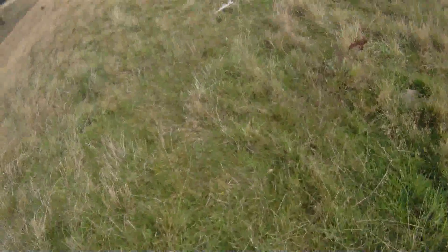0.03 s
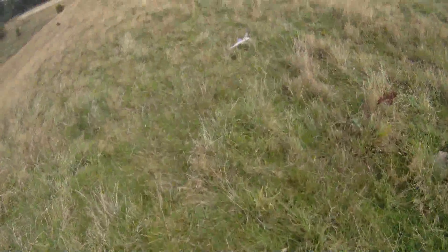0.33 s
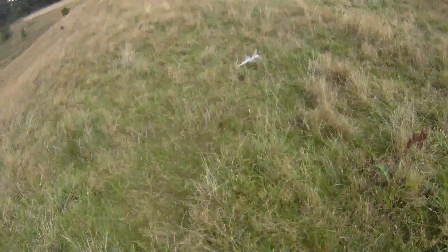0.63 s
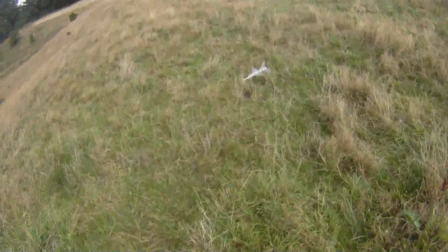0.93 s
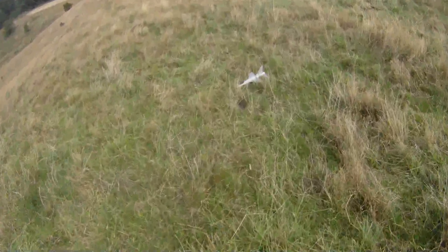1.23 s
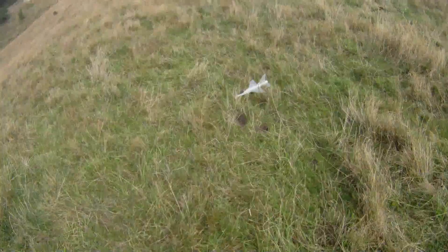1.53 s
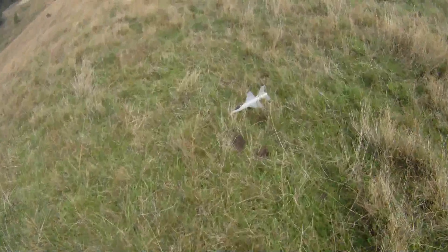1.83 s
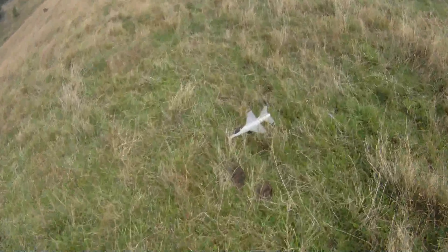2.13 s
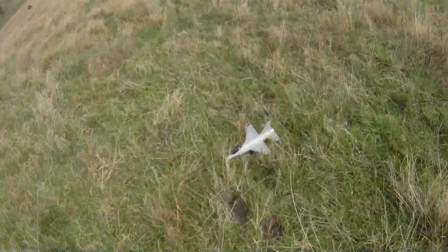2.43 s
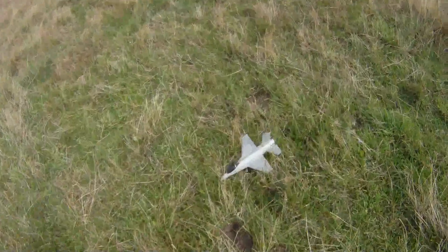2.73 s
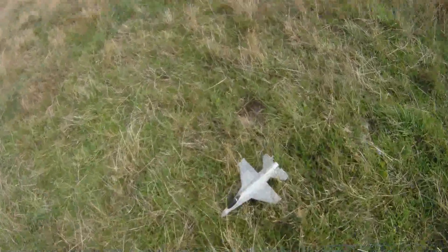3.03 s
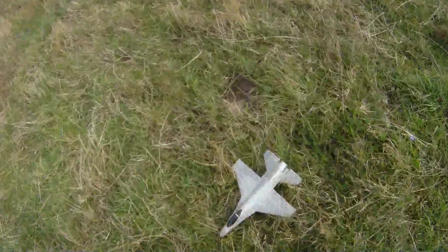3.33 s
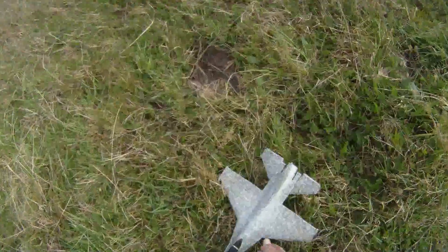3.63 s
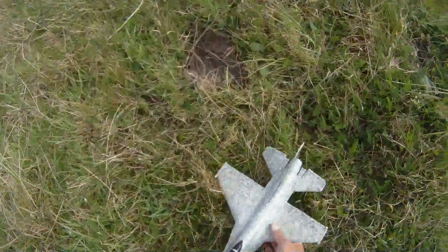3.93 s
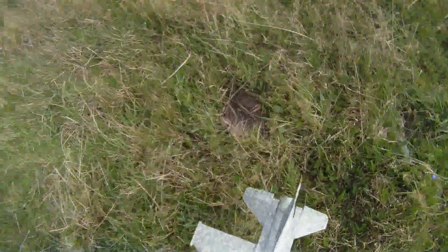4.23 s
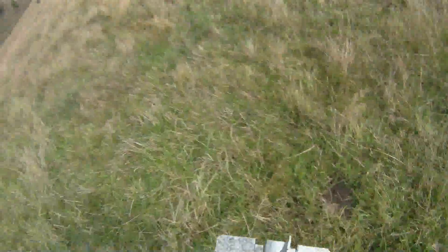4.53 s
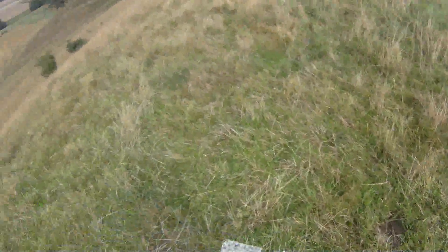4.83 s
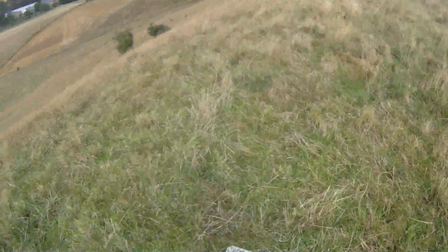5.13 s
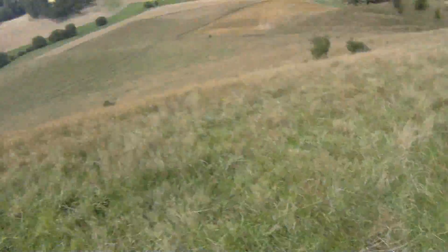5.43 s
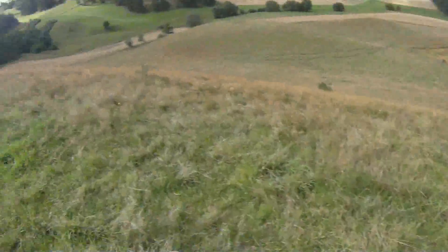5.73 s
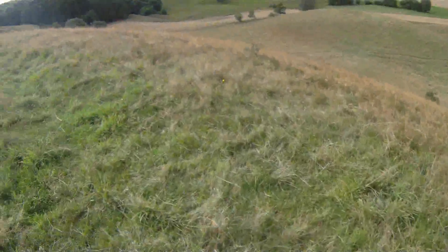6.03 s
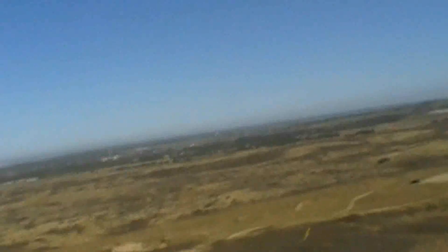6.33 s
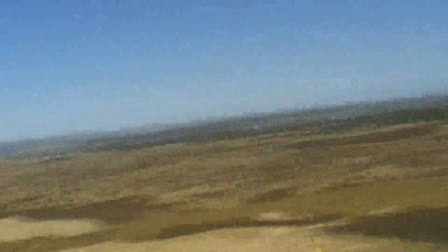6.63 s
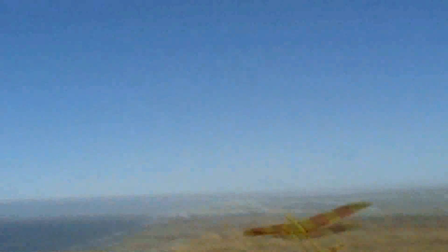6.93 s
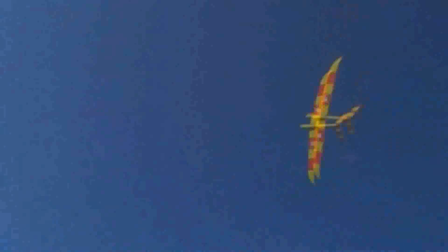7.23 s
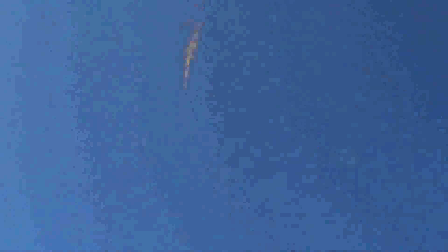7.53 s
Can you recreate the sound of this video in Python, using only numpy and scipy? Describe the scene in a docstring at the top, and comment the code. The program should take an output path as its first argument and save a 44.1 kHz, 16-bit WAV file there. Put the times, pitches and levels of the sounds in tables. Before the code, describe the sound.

Wind buffets the microphone on an open hillside, then cuts off before a model glider rushes by with a shrill whistle and falling whoosh.

```python
"""Wind buffets a hand-held microphone on a grassy hillside: gusts build, break with a push and leave lulls.
Near 4 s a foam model plane is picked up with a faint rustle. At 6.3 s the wind ends on a thump.
After a short silence a model glider rushes past very close, its edge-tone whistle overloading the
microphone at 7.1 s. Its hollow whoosh sinks away and its wake fades into a steady roar of air."""
import sys
import numpy as np
from scipy import signal
from scipy.fft import rfft, irfft
from scipy.io import wavfile
from scipy.ndimage import uniform_filter1d, map_coordinates

SR = 44100
rng = np.random.default_rng(int(sys.argv[2]) if len(sys.argv) > 2 else 0)


def wav_out(sig):
    """Save sig, one row per channel (or a flat mono array), as 16-bit PCM at SR to the path in sys.argv[1]."""
    wavfile.write(sys.argv[1], SR, np.round(np.clip(np.atleast_2d(sig).T, -1, 1) * 32767).astype(np.int16))


N = 335160
TIME, FREQS = np.arange(N) / SR, np.fft.rfftfreq(N, 1 / SR)


def glider():
    """The pass overloads the microphone: the whistle flattens and gains a third harmonic."""
    left, right = rush() + whoosh() + moans() + whistle()
    lag_s = 4e-6 + 8e-6 * bell(7.07, 0.19)  # the sound reaches the right port first
    left = amp(-1.36) * map_coordinates(left, [(TIME - lag_s) * SR], order=3, mode="nearest")
    ceiling = amp(-17)
    return ceiling * np.tanh(np.array([left, right]) * amp(0.5) / ceiling)


# Edge tone. Each row: time in seconds, pitch in Hz, ragged share of the power from 0 to 1.
EDGE_TONE = [(6.85, 5115, 0.5), (6.882, 5136, 0.13), (6.905, 5062, 0.75), (6.96, 4890, 0.98),
             (7.005, 4814, 0.52), (7.045, 4890, 0.91), (7.083, 5010, 0.05), (7.103, 4790, 0.4),
             (7.13, 4790, .65), (7.148, 4484, 0.1), (7.175, 4360, .9)]
# Brief catches in the tone. Each row: centre in seconds, depth in dB, width in seconds.
TONE_CATCHES = [(6.914, 10, 0.0036), (7.126, 9, 0.0048)]

def whistle():
    """An edge tone beats against ragged side tones and swells as the glider nears; a thin shriek joins."""
    start_s, release_s, attack_s = 6.851, 7.088, 0.017
    start_db, swell_db_per_s, release_db_per_s = -16, 34, 350
    hz, ragged = curves(EDGE_TONE)
    held_s = np.clip(TIME, start_s, release_s) - start_s
    level_db = start_db + swell_db_per_s * held_s - release_db_per_s * np.maximum(TIME - release_s, 0)
    level_db -= sum(depth_db * bell(s, width_s) for s, depth_db, width_s in TONE_CATCHES)
    envelope = np.minimum(held_s / attack_s, 1) * amp(level_db)
    clean = np.sqrt(2) * np.sin(2 * np.pi * np.cumsum(hz + 18 * wander(rate_hz=140)) / SR)
    drift_hz = 0.27 * (hz - hz[0])
    lower = amp(-4.5) * resonance(5105 + drift_hz, width_hz=136, spread=0.11)
    upper = amp(-8) * resonance(5335 + drift_hz, width_hz=200, spread=0.12)
    skirt = amp(-15.5) * resonance(5290 + drift_hz, width_hz=560, spread=0.28)
    shriek = amp(-32) * bell(7.003, 0.062) * resonance(hz * 1.79, width_hz=1100, spread=0.35)
    tone = clean * np.sqrt(1 - ragged) + (lower + upper + skirt) * np.sqrt(ragged)
    return tone * envelope + shriek * amp(3.4 * wander(rate_hz=97))


# Spectra of wing swish, wake roar and port eddies. Each row: frequency in Hz, level in dB.
SWISH_SPECTRUM = [(800, -13), (2000, -5.5), (3000, -1), (4100, -3), (5200, 2.5), (6300, -4), (7500, -3.5),
                  (9500, -9), (10300, -13), (11500, -15.5), (13300, -29), (14200, -50)]
ROAR_SPECTRUM = [(30, -32), (90, -12), (180, -5), (350, -0.5), (750, 1.5), (1300, -2.5), (1800, -9),
                 (2400, -10), (5000, -46)]
EDDY_SPECTRUM = [(20, -16), (60, -10), (130, 1), (350, -0.5), (600, -4), (1200, -39)]
# Stereo image of swish and roar. Each row: frequency in Hz, left-right correlation.
RUSH_CORRELATION = [(30, -0.56), (150, 0.76), (400, 0.88), (1000, 0.83), (2400, 0.9), (6000, 0.88),
                    (9000, 0.73), (15000, 0.47)]
# Eddies at the microphone ports. Each row: centre in seconds, level in dB, width in seconds.
EDDY_BURSTS = [(6.852, -50, 0.24), (7.178, -36, 0.0043), (7.48, -48, .04)]

def rush():
    """Air over the wings swishes louder with nearness; the wake roars behind and eddies shake the ports."""
    pass_s, near_s, pass_db, fall_db_per_decade = 7.097, 0.12, -28.5, 33
    wake_s, rise_s, decay_s, wake_db, air_db = 7.16, 0.1, 0.16, -32, -42
    distance = np.hypot(1, (TIME - pass_s) / near_s)  # 1 at the closest point
    swish_gain = amp(pass_db - fall_db_per_decade * np.log10(distance))
    wake = np.exp(-np.maximum((wake_s - TIME) / rise_s, (TIME - wake_s) / decay_s))
    roar_gain = np.hypot(amp(air_db), amp(wake_db) * wake)
    correlation, churn = at_freqs(RUSH_CORRELATION), wander(rate_hz=61)
    eddy_gain = sum(amp(db) * bell(s, width_s) for s, db, width_s in EDDY_BURSTS)
    eddies = noise(EDDY_SPECTRUM, correlation=0.22) * eddy_gain
    roar = noise(ROAR_SPECTRUM, correlation) * roar_gain * amp(1.25 * churn)
    swish = noise(SWISH_SPECTRUM, correlation) * swish_gain * amp(0.99 * churn)
    return roar + swish + eddies


# Wing resonance. Each row: time in seconds, pitch in Hz, level in dB.
WHOOSH_GLIDE = [(7.084, 1599, -54), (7.11, 1460, -35.5), (7.135, 1260, -31.5), (7.16, 902, -29.5),
                (7.18, 542, -34), (7.2, 498, -65), (7.3, 450, -71)]

def whoosh():
    """A hollow resonance falls in pitch as the wing goes by; a higher one joins it briefly."""
    hz, level_db = curves(WHOOSH_GLIDE)
    hollow = resonance(hz, width_hz=420, spread=0.085)
    upper = resonance(hz * 2.3, width_hz=280, spread=0.2) * amp(1) * bell(7.12, 0.022)
    return (hollow + upper) * amp(level_db) * gate(WHOOSH_GLIDE[0][0], WHOOSH_GLIDE[-1][0])


# Faint moans in the rush. Each row: centre in seconds, pitch in Hz, level in dB, width in seconds.
MOAN_SWELLS = [(6.70, 2900, -46.5, 0.023), (6.842, 2800, -47, 0.015), (7.32, 3600, -44, 0.039),
               (7.431, 1960, -45.5, 0.018), (7.577, 1820, -43.5, .035)]

def moans():
    """Each moan swells and fades in one narrow resonance."""
    centre_s, hz, level_db, width_s = np.transpose(MOAN_SWELLS)
    nearest = abs(TIME[:, None] - centre_s).argmin(1)
    swell = amp(level_db[nearest]) * bell(centre_s[nearest], width_s[nearest])
    return swell * resonance(hz[nearest], width_hz=150, spread=0.13)


# Spectra of the three wind layers. Each row: frequency in Hz, level in dB.
RUMBLE_SPECTRUM = [(10, -13.5), (25, -2), (45, 2.5), (90, 1.5), (150, -4.5), (230, -15), (400, -28.5),
                   (900, -81)]
FLUTTER_SPECTRUM = [(60, -35.5), (140, 3), (220, 1.5), (330, -1.5), (460, -3.5), (570, -9.5), (720, -20),
                    (1000, -30), (1600, -42), (4000, -78.5)]
HISS_SPECTRUM = [(400, -11.5), (900, 9.5), (1400, 2.5), (2200, 0.5), (3600, -5.5), (4200, -15.5),
                 (5000, -17.5), (6100, -39), (7500, -19), (9500, -14.5), (11000, -20.5), (15000, -29)]
# Slow wind strength before gusts. Each row: time in seconds, flutter in dB, hiss in dB.
WIND_LEVELS = [(0.0, -38, -77), (0.1, -38, -65), (0.38, -36.5, -65.5), (0.78, -38.5, -71.5),
               (1.3, -41.5, -71.5), (1.53, -36.5, -66), (1.7, -40, -73), (2.25, -38.5, -70),
               (2.6, -45, -74), (3.1, -41.5, -71), (3.42, -52.5, -86), (3.7, -55.5, -73.5),
               (3.95, -49.5, -75), (4.25, -40, -71.5), (4.55, -38.5, -65.5), (4.88, -36.5, -65.5),
               (5.35, -49, -74), (5.9, -43, -68), (6.25, -38.5, -67)]

def wind():
    """Turbulence at the microphone: the same gusts and eddies shake rumble, flutter and, most, hiss."""
    calm_db, even_db = -53.5, -45.5  # flutter below these: the rumble dies, the wind grows patchier
    flutter_db, hiss_db = curves(WIND_LEVELS)
    gust_db = gusts_db()
    flutter_db += gust_db
    hiss_db += 1.1 * gust_db
    rumble_db = -38 + 0.48 * gust_db - 0.84 * np.maximum(calm_db - flutter_db, 0)
    patchiness = np.clip(0.5 + 0.042 * (even_db - flutter_db), 0.5, 1.4)
    eddies = patchiness * unit(0.45 * wander(rate_hz=26) + wander(rate_hz=55) + 0.89 * wander(rate_hz=243))
    rumble = steadied(noise(RUMBLE_SPECTRUM) * amp(1.3 * eddies))
    flutter = steadied(noise(FLUTTER_SPECTRUM) * amp(2.8 * eddies))
    tearing_db = 2.3 * abs(rumble[0])  # air tears off hardest on the pressure peaks
    hiss = steadied(noise(HISS_SPECTRUM) * amp(3.8 * eddies + tearing_db))
    return rumble * amp(rumble_db) + flutter * amp(flutter_db) + hiss * amp(hiss_db)


# Gusts breaking on the microphone. Each row: time in seconds, push in dB, crackle in dB,
# build-up in dB (none if negative), lull depth in dB, lull length in seconds.
GUSTS = [(0.21,-34,-57.5,-4,7,0.037), (0.69,-37,-64,4.5,1,0.064), (0.985,-29.5,-61,2.5,5,0.025),
         (1.033,-31,-58,4,2,0.048), (1.162,-39,-59,7,7,0.049), (1.502,-39,-65,3.5,1.5,0.14),
         (1.612,-34,-67.5,1,6,0.041), (1.902,-35,-61,2.5,10,0.089), (2.058,-30,-69,1.5,1,0.14),
         (2.41,-32,-66,-3.5,8,0.026), (2.865,-30,-59,2,7,0.13), (3.123,-41,-60,1,0.5,0.07),
         (3.207,-28,-62.5,1,4,0.079), (3.3,-27,-62,1.5,8.5,0.2), (3.337,-29,-62.5,6.5,3.5,0.051),
         (3.478,-28.5,-63,1,0.5,0.068), (3.606,-28,-61,13,10,0.15), (3.792,-33.5,-64,15.5,4,0.19),
         (3.99,-28,-52.5,9.5,11,0.042), (4.136,-28,-62,1,9,0.03), (4.217,-30,-57,-2,8.5,0.1),
         (4.326,-29.5,-61,0,1,0.18), (4.704,-29,-65,3,4.5,0.11), (4.889,-35,-62,3,3.5,0.046),
         (4.969,-27.5,-57,3,3.5,0.12), (5.144,-32.5,-63,2.5,2,0.14), (5.293,-33,-64,4,1,0.11),
         (5.445,-33,-65,6.5,2,0.06), (5.848,-26.5,-62,6.5,2.5,0.027), (5.921,-33,-68,8,5,0.14),
         (6.202,-44,-62.5,6,6.5,0.059), (6.28,-35,-63,9,0,0.05)]

def gusts_db():
    """Each gust builds up, collapses just after it breaks, and leaves a lull."""
    build_s, collapse_s, lag_s = 0.028, 0.0069, 0.0064
    t = np.arange(0, N / SR, 0.001)
    level_db = np.zeros(len(t))
    for break_s, _, _, build_db, lull_db, lull_s in GUSTS:
        age_s = t - break_s
        broken = 0.5 + 0.5 * np.tanh((age_s - lag_s) / collapse_s)
        level_db += (1 - broken) * max(build_db, 0) * np.exp(-(age_s / build_s) ** 2)
        level_db -= broken * lull_db * np.exp(-(age_s / lull_s) ** 4)
    return np.interp(TIME, t, level_db)


# Knocks of air that end the wind. Each row: time in seconds, push in dB, width in seconds, crackle in dB.
AIR_THUMPS = [(6.2692, -20, 0.0009, -44.5), (6.2805, -15.5, 0.0022, -49), (6.2865, -26, 0.0012, -48)]

def pushes():
    """A breaking gust or a thump pushes and then pulls on the diaphragm, with a crackle."""
    typical_width_s, crackle_decay_s = 0.0029, 0.002
    breaks = [(s, push_db, typical_width_s * np.exp(0.29 * rng.standard_normal()), crackle_db)
              for s, push_db, crackle_db, *_ in GUSTS]
    pressure, crackle_gain = np.zeros((2, N))
    for s, push_db, width_s, crackle_db in breaks + list(AIR_THUMPS):
        near = slice(max(int((s - 0.04) * SR), 0), int((s + 0.04) * SR))
        age_s = TIME[near] - s
        u = age_s / width_s
        pressure[near] -= amp(push_db) * u * np.exp((1 - u ** 2) / 2)
        crackle_gain[near] += amp(crackle_db) * np.exp(-abs(age_s) / crackle_decay_s)
    return pressure + crackle_gain * crackle()


# Crackle spectrum. Each row: frequency in Hz, level in dB.
CRACKLE_SPECTRUM = [(400, -10), (1100, 5.5), (2500, -2), (4500, -9), (6100, -22.5), (7500, -12.5),
                    (10000, -16.5), (15500, -30.5)]

def crackle():
    """The bright noise of air breaking on the microphone."""
    return noise(CRACKLE_SPECTRUM, correlation=0.8)


# Hand gripping the plane. Each row: time in seconds, level in dB, squeak pitch in Hz.
GRIP = [(3.78, -110, 3100), (3.84, -78, 3000), (3.89, -72, 2920), (3.92, -71, 2500), (3.948, -68, 2270),
        (3.957, -62, 2120), (3.966, -76, 2100), (4.0, -110, 2100)]
# Foam friction spectrum. Each row: frequency in Hz, level in dB.
FOAM_SPECTRUM = [(1200, -24), (2000, -7.5), (2400, 2.5), (3000, -1), (3700, -1), (4300, -14), (6100, -33.5)]

def rustle():
    """Foam rubs in small, uneven slips; a falling squeak takes over as the grip tightens."""
    level_db, hz = curves(GRIP)
    squeak = resonance(hz, width_hz=220, spread=0.12) * amp(-7 + 7.6 * bell(3.955, 0.034))
    friction = noise(FOAM_SPECTRUM, correlation=0.9) * amp(-2.5)
    slips_db = 2.2 * wander(rate_hz=140)
    return (friction + squeak) * amp(level_db + slips_db)


# Grass spectrum. Each row: frequency in Hz, level in dB.
GRASS_SPECTRUM = [(200, -3.5), (900, 0), (3500, -7.5), (6100, -21), (8000, -13), (15000, -22)]

def grass():
    """A faint, wide hiss of wind in the grass."""
    return amp(-80) * noise(GRASS_SPECTRUM, correlation=0.091)


def converter_fizz(x, mirrors_hz=(12000, 8000)):
    """A coarse converter mirrors the slope of the sound around two high frequencies."""
    upper, lower = np.cos(2 * np.pi * np.outer(mirrors_hz, TIME))
    return np.gradient(x, axis=1) * (amp(0.5) * upper + amp(-20.5) * lower)


def noise(spectrum, correlation=1.0):
    """Stereo noise of rms 1 with a given spectrum and left-right correlation."""
    mid, side = rfft(rng.standard_normal((2, N)))
    mid, side = mid * np.sqrt(1 + correlation), side * np.sqrt(1 - correlation)
    return unit(irfft(np.array([mid + side, mid - side]) * amp(at_freqs(spectrum)), N))


def resonance(hz, width_hz, spread):
    """Turbulence in a narrow band that follows a pitch curve; spread is the side-to-mid ratio."""
    bins = np.arange(-N // 16, N // 16)
    mid, side = rng.standard_normal((2, len(bins))) + 1j * rng.standard_normal((2, len(bins)))
    band = np.exp(-(bins * SR / N / width_hz) ** 2)
    spectrum = np.zeros((2, N), complex)
    spectrum[:, bins] = np.array([mid + spread * side, mid - spread * side]) * band
    carrier = np.exp(2j * np.pi * np.cumsum(hz) / SR)
    return unit((np.fft.ifft(spectrum) * carrier).real)


def wander(rate_hz):
    """Smooth random motion of rms 1, rolling off above rate_hz."""
    return unit(irfft(rfft(rng.standard_normal(N)) * np.exp(-(FREQS / rate_hz) ** 2), N))


def steadied(x, window_samples=4400):
    """Keeps the fast texture and holds the slow level at 1."""
    power = uniform_filter1d((x ** 2).mean(0), window_samples)
    return x / np.sqrt(uniform_filter1d(power, window_samples // 2) + 1e-12)


def curves(rows):
    """Each value column of a timed table, at every sample."""
    times_s, *columns = np.transpose(rows)
    return [np.interp(TIME, times_s, column) for column in columns]


def at_freqs(points):
    """Interpolates (Hz, value) points on a log-frequency axis."""
    hz, value = np.transpose(points)
    return np.interp(np.log(FREQS + 1), np.log(hz), value)


def bell(centre_s, width_s):
    """Gaussian swell of height 1."""
    return np.exp(-((TIME - centre_s) / width_s) ** 2)


def gate(start_s, end_s):
    """Gate with 1 ms edges."""
    return uniform_filter1d(((TIME >= start_s) & (TIME < end_s)) * 1.0, SR // 1000)


def amp(db):
    """Decibels to gain."""
    return 10 ** (np.asarray(db) / 20)


def unit(x):
    """Scales to rms 1."""
    return x / np.sqrt(np.mean(x ** 2) + 1e-20)


def scene():
    """The windy hillside, a silence, then the glider."""
    wind_end_s, glider_start_s = 6.288, 6.678
    hillside = (wind() + grass() + pushes() + rustle()) * gate(0, wind_end_s)
    return hillside + converter_fizz(hillside) + glider() * gate(glider_start_s, np.inf)


def record(dry):
    """The recorder's steep band limit."""
    cutoff_hz = 15780
    lowpass = signal.firwin(511, cutoff_hz, window=("kaiser", 9), fs=SR)
    return signal.oaconvolve(dry, lowpass[None], "same")


dry = scene()
out = record(dry)
wav_out(out)
```